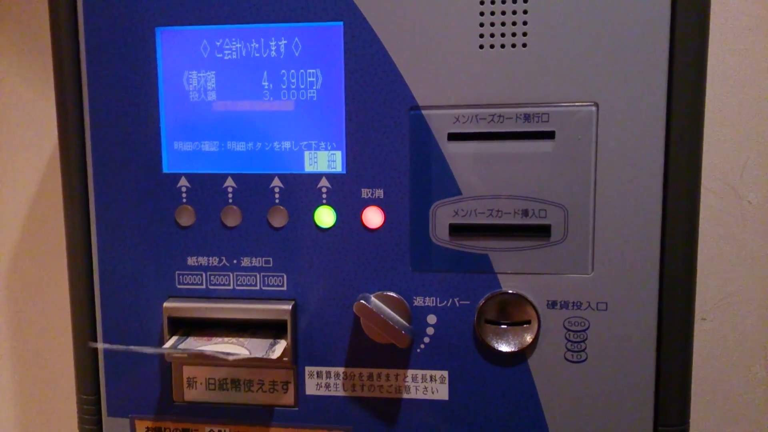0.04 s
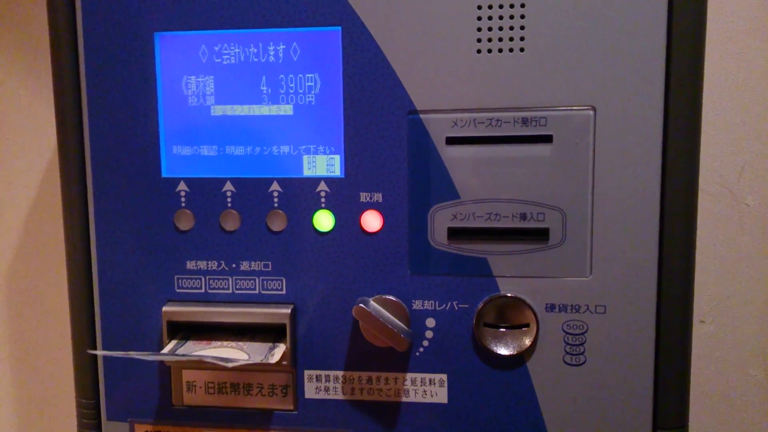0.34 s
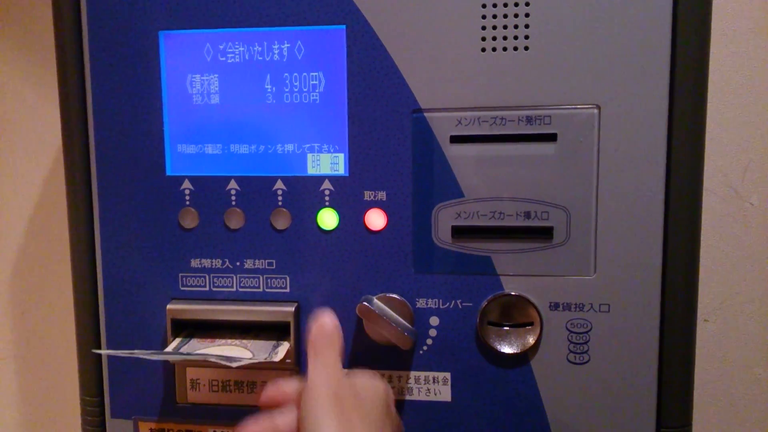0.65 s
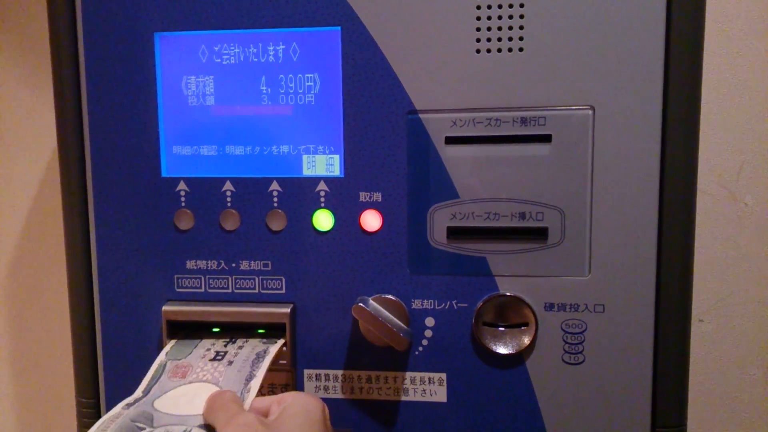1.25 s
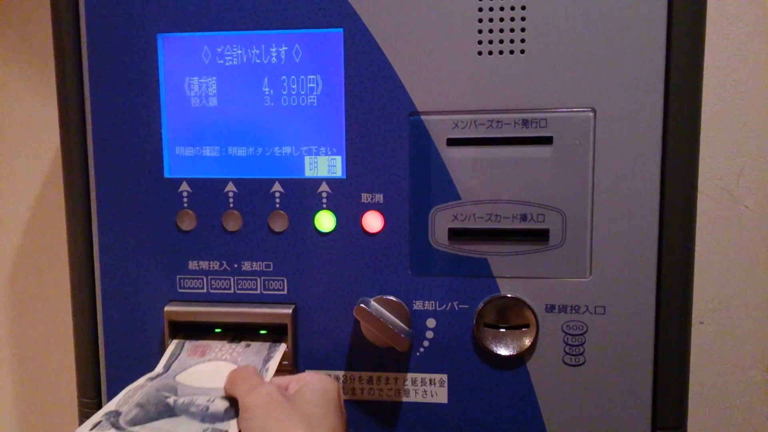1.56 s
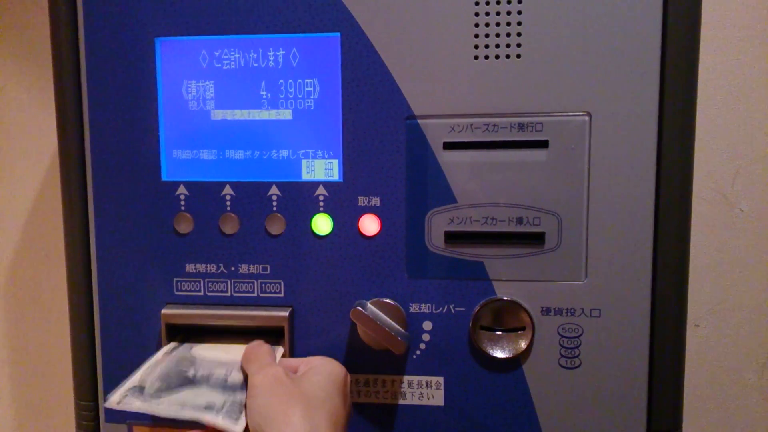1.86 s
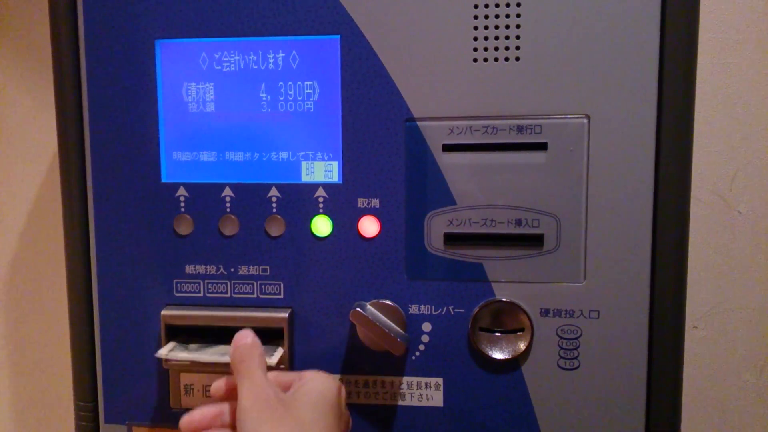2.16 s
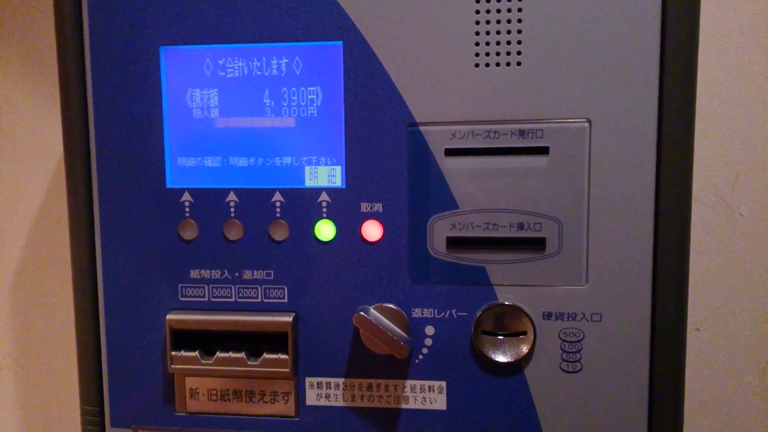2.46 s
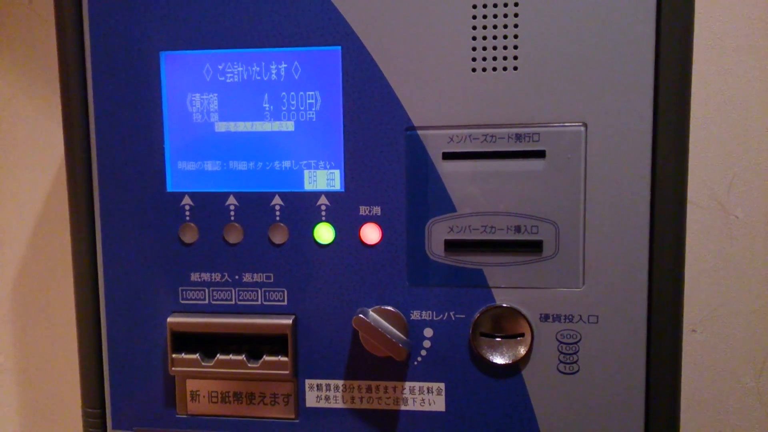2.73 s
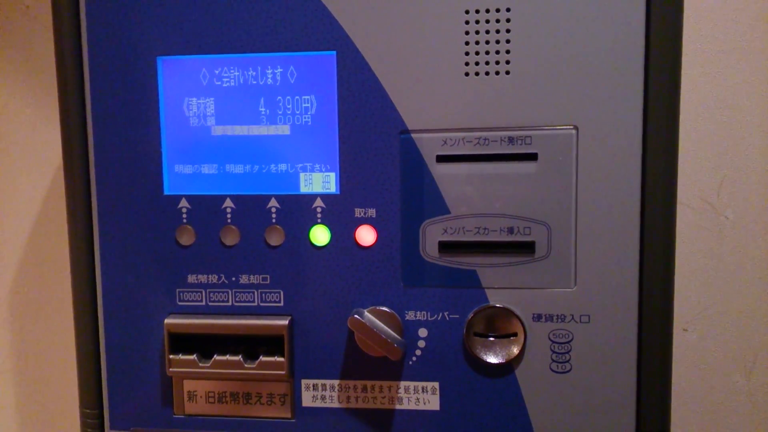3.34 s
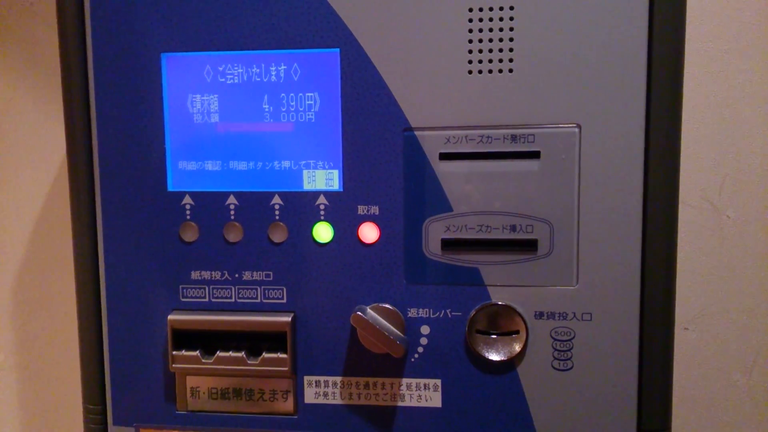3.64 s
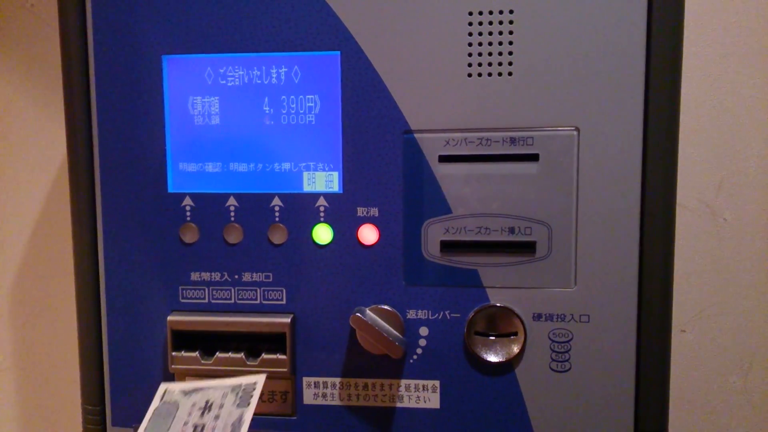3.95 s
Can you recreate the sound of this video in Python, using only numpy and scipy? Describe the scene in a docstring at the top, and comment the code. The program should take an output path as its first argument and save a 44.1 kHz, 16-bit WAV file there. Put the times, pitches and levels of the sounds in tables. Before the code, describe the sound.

Payment machine swallowing a banknote: light paper ticks, then latch clacks and a geared whir.

```python
"""A quiet room, close to a payment machine that swallows a banknote.
The note ticks, rustles and hisses against the slot. A latch clacks, a geared motor draws the note in
over rumbling rollers, a gate snaps, and a stacking motor runs, pauses and starts again.
Gear teeth rasp and whine; blows ring the latch and slot, and the front panel thuds.
Panel and room add short echoes over faint air noise and a deep throb."""
import sys
import numpy as np
from scipy import signal
from scipy.fft import rfft, irfft
from scipy.io import wavfile
from scipy.ndimage import uniform_filter1d, map_coordinates

SR = 44100
rng = np.random.default_rng(int(sys.argv[2]) if len(sys.argv) > 2 else 0)


def digitize_waveform(pressure):
    """Quantize a signal to 16-bit integers and store it at the path in sys.argv[1].

    Rows of a 2-D input are taken as channels; values are limited to [-1, 1].
    """
    field = np.atleast_2d(pressure).T
    bounded = np.clip(field, -1, 1)
    quanta = np.round(bounded * 32767).astype(np.int16)
    wavfile.write(sys.argv[1], SR, quanta)


N = 176400

# Spectra of room air, rollers and paper hiss. Each row: frequency in Hz, gain in dB.
AIR_COLOUR = [(40, -11.5), (70, -9), (130, -21), (300, -26), (700, -34.5), (1500, -39.5), (3000, -43),
              (4800, -37.5), (7000, -47), (11000, -49), (15500, -46)]
ROLLER_COLOUR = [(50, 5), (110, -20), (170, -3), (240, -5), (390, -17), (520, -10), (900, -14.5),
                 (1300, -22.5), (2000, -29.5)]
HISS_COLOUR = [(500, 0.5), (2300, -16.5), (4000, 4), (7000, 0), (11000, -4), (15500, -11)]
# Resonances of each part. Each row: frequency in Hz, gain in dB.
SLOT_BODY = [(300, -19.5), (700, -13.5), (1300, -14), (2300, -9), (3200, -7), (4000, -3.5), (4950, 1.5),
             (5600, -5.5), (6300, -11), (8500, -14), (12000, -25.5), (15500, -34)]
LATCH_BODY = [(200, -24), (400, -19), (620, -12), (900, -19.5), (1300, -11.5), (1800, -10), (2700, -12),
              (3300, -2), (3900, -7), (4700, 1), (5300, 3.5), (6200, -3.5), (7100, -4), (8300, -3),
              (9800, -4.5), (11300, -1), (13300, -5.5), (15500, -12.5)]
FEED_BODY = [(100, -13.5), (250, -17), (600, -13.5), (1400, -21.5), (2250, -13), (2700, -14.5), (3400, 0.5),
             (3800, -9), (4450, 4), (5000, -4.5), (5600, -0.5), (6150, -11.5), (6800, -8), (7500, -15.5),
             (9800, -23), (11300, -21.5), (12800, -29), (15500, -29)]
STACKER_BODY = [(100, -14), (300, -6), (700, -11), (1400, -15.5), (2600, -6), (3100, -4.5), (3700, 2.5),
                (5000, 0.5), (6200, -4.5), (8000, -15.5), (11000, -21), (15500, -29.5)]
# Envelopes of rollers, slot friction, paper hiss and feed motor. Each row: time in seconds, level in dB.
ROLLER_LEVEL = [(1.68, -100), (1.74, -57.5), (2.0, -76), (2.6, -64), (3.0, -70), (3.3, -58), (3.55, -66),
                (3.7, -72.5), (3.84, -80), (3.92, -66)]
SLIDE_LEVEL = [(0, -61), (.15, -76.5), (.34, -80.5), (.42, -61), (.48, -53.5), (.52, -57.5), (.555, -56),
               (.64, -75), (.84, -78), (.89, -63.5), (.95, -61.5), (1.07, -67.5), (1.12, -58), (1.22, -75),
               (1.35, -79), (1.52, -67), (1.56, -63), (1.66, -70.5), (2.2, -73), (2.6, -120)]
HISS_LEVEL = [(.36, -85), (.44, -69), (.48, -57), (.515, -68), (.56, -105), (.84, -79.5), (.89, -67.5),
              (.96, -58), (1.05, -71), (1.12, -66), (1.2, -82.5), (1.7, -68), (1.92, -57), (2.55, -60),
              (2.7, -71), (2.9, -120)]
FEED_LEVEL = [(1.68, -100), (1.72, -43), (1.78, -43.5), (1.85, -47.5), (2.21, -45.5), (2.3, -48),
              (2.52, -47.5), (2.59, -45), (2.75, -47), (2.88, -47), (3.02, -47), (3.3, -46), (3.4, -64),
              (3.55, -49), (3.66, -100), (3.72, -100)]
# Front panel thuds. Each row: start in seconds, level in dB, pitch in Hz, decay in seconds.
THUDS = [(.909, -61, 610, .035), (1.687, -55, 410, .03), (3.058, -56, 360, .04), (3.062, -57, 170, .045)]
# Blows of the note on the slot, and of latch and gate.
# Each row: start in seconds, level in dB, decay in seconds, bass in dB, treble in dB.
NOTE_FLICKS = [(.0412, -43.5, 0.0025, -2, 1), (.096, -55.5, 0.012, 6, -44), (.322, -64.5, 0.00076, 5, 20),
               (.376, -53, 0.0011, 1, 0), (.4294, -52, 0.0014, 11, -8), (.4643, -27, 0.0017, -7, -3),
               (.4955, -46, 0.0014, 2, 7), (.528, -26, 0.0016, -15, -17), (.538, -41, 0.0029, -11, -11),
               (.561, -40, 0.0017, -6, -17), (.649, -58, .001, 1, 10), (.908, -42.5, 0.0078, 3, 0),
               (1.099, -46.5, 0.0043, -15, -6), (1.111, -47, 0.0053, -20, 6), (1.1255, -44, 0.013, -49, -5),
               (1.415, -58, 0.00085, 1, 12), (1.5395, -47, 0.0013, -9, 1), (1.551, -47.5, 0.0017, -7, 3)]
LATCH_CLACKS = [(1.6822, -42, 0.0027, 6, -8), (1.6842, -34.5, 0.002, -15, -0.5),
                (1.6866, -22.5, 0.0053, -16, -20), (1.6905, -31.5, 0.00081, 0, -28),
                (1.6975, -32, 0.0079, -0.5, -12), (1.7402, -42.5, 0.0017, 12, 8.5),
                (1.7412, -25, 0.0056, -19, -28), (2.5728, -38, 0.001, -19, -3),
                (3.0545, -24, 0.0059, -31, -5), (3.0575, -40, 0.03, 5, -12),
                (3.0635, -25.5, 0.0043, -13, -32), (3.0662, -33.5, 0.0011, 8, -20),
                (3.642, -42.5, 0.0009, 3.5, -38)]
# Feed motor speed. Each row: time in seconds, tooth rate in Hz.
FEED_SPEED = [(1.69, 1000), (1.77, 1146), (1.85, 1121), (1.89, 1128), (1.97, 1125), (2.08, 1134),
              (2.12, 1153), (2.16, 1146), (2.22, 1121), (2.31, 1118), (2.39, 1095), (2.44, 1107),
              (2.52, 1105), (2.59, 1132), (2.65, 1127), (2.75, 1150), (2.81, 1120), (2.96, 1119),
              (3.07, 1127), (3.14, 1147), (3.22, 1129), (3.32, 1150), (3.37, 1236), (3.56, 1232),
              (3.7, 800)]
# Stacking motor run. Each row: time in seconds, tooth rate in Hz, level in dB.
STACKER_RUN = [(3.1, 905, -100), (3.24, 1200, -55.5), (3.37, 1295, -47.5), (3.56, 1311, -50),
               (3.61, 1162, -62.5), (3.68, 905, -76), (3.75, 703.4, -81), (3.83, 699, -76),
               (3.87, 1168, -53.5), (3.91, 1265, -49), (4.0, 1285, -49)]
# Shaft hum and weak gear tones. Each row: multiple of the shaft rate, level in dB re the motor.
FEED_WHINE = [(2, -22), (3, -24), (24, -25), (37, -21), (49, -20), (69, -23), (72, -20), (73, -23)]
STACKER_WHINE = [(12, -28), (33, -25), (46, -16), (47, -18), (51, -19), (54, -16)]
# Strong tones, keyed by multiple of the shaft rate.
# Each row: time in seconds, level in dB before the trim.
FEED_SWELLS = { 1: [(1.68, -110), (1.75, -74), (2.1, -68), (2.3, -62), (2.65, -61), (2.8, -69), (3.15, -70),
               (3.3, -61), (3.6, -72), (3.7, -110)], 36: [(1.7, -110), (1.79, -58), (1.92, -70),
               (2.02, -59), (2.08, -67), (2.15, -54), (2.36, -68), (2.44, -56), (2.55, -65), (2.69, -56),
               (2.82, -68), (2.95, -61), (3.04, -70), (3.135, -54), (3.19, -73), (3.3, -57), (3.45, -110)],
               48: [(1.7, -110), (1.78, -60), (1.87, -55), (1.94, -58), (2.05, -49), (2.11, -57),
               (2.36, -58), (2.44, -52), (2.53, -50), (2.62, -52), (2.75, -64), (2.85, -48), (2.96, -61),
               (3.21, -57), (3.33, -64), (3.4, -56), (3.56, -56), (3.66, -110)], 57: [(1.7, -110),
               (1.9, -66), (2.74, -68), (2.82, -56), (2.95, -62), (3.25, -63), (3.4, -110)],
               60: [(1.7, -110), (1.8, -68), (1.87, -58), (1.97, -59), (2.07, -70), (2.23, -56),
               (2.42, -71), (2.66, -64), (3.3, -64), (3.45, -110)], }
STACKER_SWELLS = { 24: [(3.25, -110), (3.38, -62), (3.45, -59), (3.55, -60), (3.63, -100), (3.84, -100),
                  (3.91, -71), (4.0, -71)], 36: [(3.25, -110), (3.38, -62), (3.53, -55), (3.57, -58),
                  (3.64, -100), (3.84, -100), (3.91, -61), (4.0, -62)], }
# Stereo balance. Each row: frequency in Hz, left minus right in dB.
BALANCE = [(100, -2.5), (400, -5), (1300, 1), (2300, -6.5), (3300, -3), (4000, -9), (4700, -12),
           (5300, -16), (6200, -6.5), (6900, -6.5), (8000, -3.5), (9700, -6), (11400, -3), (13300, 1),
           (15500, 11.5)]


def from_db(db):
    return 10 ** (np.asarray(db) / 20)


def unit_rms(x):
    return x / np.sqrt(np.mean(x ** 2) + 1e-20)


def curves(rows):
    """Each column after the time, interpolated per sample."""
    times_s, *columns = np.transpose(rows)
    return [np.interp(np.arange(N) / SR, times_s, column) for column in columns]


def drift(rate_hz):
    """Slow random wander, rms 1."""
    step = 40
    pole = np.exp(-2 * np.pi * rate_hz * step / SR)
    noise = rng.standard_normal(N // step + 2002)
    slow = signal.lfilter([1], [1, -2 * pole, pole * pole], noise)[2000:]
    return np.interp(np.arange(N) / step, np.arange(len(slow)), unit_rms(slow))


def response(spectrum, power=1, size=4096):
    """Minimum-phase impulse response of a spectrum."""
    hz, db = np.transpose(spectrum)
    grid_hz = np.maximum(np.arange(size // 2 + 1) * SR / size, 1)
    gain = from_db(power * np.interp(np.log(grid_hz), np.log(hz), db))
    cepstrum = irfft(np.log(gain))
    cepstrum[1:size // 2] *= 2
    cepstrum[size // 2 + 1:] = 0
    return irfft(np.exp(rfft(cepstrum)))


def ring(force, spectrum):
    """A force rings a body; white noise keeps its level."""
    impulse = response(spectrum)
    return signal.oaconvolve(force, impulse / np.linalg.norm(impulse))[:N]


def from_slot(x, lag_s=7 / SR):
    """Sound from the slot reaches the right side later."""
    t = np.arange(N) / SR
    return np.array([x, np.interp(t - lag_s, t, x)])


def room_noise(air_db=-62, throb_db=-46.5, throb_hz=20.2, mono_below_hz=500):
    """A deep throb and faint air, alike on both sides only in the bass."""
    mid, side = (ring(rng.standard_normal(N), AIR_COLOUR) for _ in range(2))
    side = signal.sosfilt(signal.butter(1, mono_below_hz, "high", fs=SR, output="sos"), side)
    air = mid + 0.69 * side * np.array([[1], [-1]])
    waver_db = drift(rate_hz=1)
    throb = unit_rms(np.sin(2 * np.pi * throb_hz * np.arange(N) / SR) * from_db(waver_db))
    return from_db(air_db) * air + from_db(throb_db) * throb


def echoes(x, t60_s, low_cut_hz=285):
    """Dense dying reflections above the bass, unrelated left and right."""
    t = np.arange(SR // 2) / SR
    tail = rng.standard_normal((2, len(t))) * from_db(-60 * t / t60_s) * (t > .0005)
    tail /= np.linalg.norm(tail, axis=1, keepdims=True)
    x = signal.sosfilt(signal.butter(2, low_cut_hz, "high", fs=SR, output="sos"), x)
    return signal.oaconvolve(x, tail, axes=1)[:, :N]


def rollers():
    """Rubber rollers and belts rumble in the cabinet."""
    level_db, = curves(ROLLER_LEVEL)
    return from_db(level_db) * ring(rng.standard_normal(N), ROLLER_COLOUR)


def panel_thuds(edge_ratio=1.125):
    """Clusters of low panel modes start abruptly and die away."""
    out = 0
    for start_s, db, hz, decay_s in THUDS:
        age_s = np.arange(N) / SR - start_s
        envelope = (age_s > 0) * np.exp(-abs(age_s) / decay_s)
        band = signal.butter(1, [hz / edge_ratio, hz * edge_ratio], "band", fs=SR, output="sos")
        modes = unit_rms(signal.sosfilt(band, rng.standard_normal(N)))
        out += from_db(db) * envelope * modes
    return out


def sliding_note(catches_per_s=1100, catch_db=-10.5):
    """Paper fibres catch on the slot and ring it; the face of the note hisses."""
    def friction():
        catches = (rng.random(N) < catches_per_s / SR) * rng.standard_normal(N)
        return unit_rms(rng.standard_normal(N) + from_db(catch_db) * unit_rms(catches))

    rustle = from_db(curves(SLIDE_LEVEL)[0]) * ring(friction(), SLOT_BODY)
    hiss = from_db(curves(HISS_LEVEL)[0]) * ring(friction(), HISS_COLOUR)
    return rustle + hiss


def chatter(envelope):
    """Random contacts under an envelope, whitened to favour no pitch."""
    hit = envelope * rng.standard_normal(len(envelope))
    for _ in range(3):
        spectrum = rfft(hit)
        white = irfft(spectrum / (abs(spectrum) + 1e-20), len(hit))
        local_rms = np.sqrt(abs(uniform_filter1d(white ** 2, size=40)) + 1e-20)
        hit = envelope * white / local_rms
    return hit


def blows(rows, body, rattle_db, rattle_s=.025, bass_hz=3050, treble_hz=7340):
    """Each blow, a short chatter and a weaker rattle, rings one part."""
    force = np.zeros(N + SR)
    t = np.arange(SR // 5) / SR
    for start_s, db, decay_s, bass_db, treble_db in rows:
        hit = chatter(np.exp(-t / decay_s) + from_db(rattle_db) * np.exp(-t / rattle_s))
        tilt = [(bass_hz / 2, bass_db), (bass_hz, bass_db / 2), (np.sqrt(bass_hz * treble_hz), 0),
                (treble_hz, treble_db / 2), (2 * treble_hz, treble_db)]
        hit = signal.oaconvolve(hit, response(tilt, size=256))[:len(t)]
        start = int(start_s * SR)
        force[start:start + len(t)] += from_db(db) * hit
    return ring(force[:N], body)


def gear_tone(phase_rad, waver_db=1.5, waver_hz=7, flutter_db=2.8, flutter_hz=35, jitter_rad=.25):
    """A sine that wavers slowly and flutters fast, rms 1."""
    gain = from_db(waver_db * drift(waver_hz) + flutter_db * drift(flutter_hz))
    phase_rad = phase_rad + jitter_rad * drift(flutter_hz) + 2 * np.pi * rng.random()
    return unit_rms(gain * np.sin(phase_rad))


def gear_rasp(contact, turns, housing, repeat_share=.1):
    """Rubbing teeth ring the housing; part of the roughness repeats every turn."""
    profile = rng.standard_normal(400)
    wear = unit_rms(map_coordinates(profile, [turns % 1 * len(profile)], order=3, mode="grid-wrap"))
    surface = np.sqrt(repeat_share) * wear + np.sqrt(1 - repeat_share) * rng.standard_normal(N)
    return ring(unit_rms(contact * surface), housing)


def motor(tooth_hz, level_db, housing, whine, swells, rasp_db,
          teeth=12, tooth_scatter_db=.5, leak_share=.39, tone_trim_db=-3):
    """Meshing teeth rasp, the gears whine and the shaft hums. Stereo."""
    teeth_passed = np.cumsum(tooth_hz * (1 + .0012 * drift(rate_hz=22.5))) / SR
    turns = teeth_passed / teeth
    shaft_rad = 2 * np.pi * turns
    strength = from_db(tooth_scatter_db * rng.standard_normal(N)[teeth_passed.astype(int)])
    tooth_pulses = np.exp(.91 * np.cos(2 * np.pi * teeth_passed))
    contact = tooth_pulses * strength * (1 + .044 * np.cos(shaft_rad))
    # Rasp leaking through the cabinet reaches each side on its own.
    direct, *leaks = (gear_rasp(contact, turns, housing) for _ in range(3))
    rasp = np.sqrt(1 - leak_share) * from_slot(direct) + np.sqrt(leak_share) * np.array(leaks)
    weak = sum(from_db(db) * gear_tone(k * shaft_rad) for k, db in whine)
    # Strong gear tones sound alike on both sides, with no delay.
    strong = sum(from_db(curves(rows)[0]) * gear_tone(k * shaft_rad) for k, rows in swells.items())
    tones = from_slot(from_db(level_db) * weak) + from_db(tone_trim_db) * strong
    return from_db(level_db + rasp_db) * rasp + tones


def scene():
    """Note from the slot, latch and motors from the whole cabinet; panel and room echo."""
    feed = motor(*curves(FEED_SPEED), *curves(FEED_LEVEL), FEED_BODY, FEED_WHINE, FEED_SWELLS, rasp_db=-2)
    stacker = motor(*curves(STACKER_RUN), STACKER_BODY, STACKER_WHINE, STACKER_SWELLS, rasp_db=1)
    latch = np.array([blows(LATCH_CLACKS, LATCH_BODY, rattle_db=-11) for side in range(2)])
    note = blows(NOTE_FLICKS, SLOT_BODY, rattle_db=-25) + sliding_note()
    machine = feed + stacker + latch + from_slot(note + panel_thuds() + rollers())
    panel_echo = from_db(-7) * echoes(machine, t60_s=.03)
    room_echo = from_db(-8) * echoes(machine, t60_s=.3)
    return machine + panel_echo + room_echo + room_noise()


def record(dry):
    """Two microphones of differing colour, then a steep top cut."""
    stop_hz = 16600
    heard = [signal.oaconvolve(x, response(BALANCE, power))[:N] for x, power in zip(dry, (.5, -.5))]
    return signal.sosfilt(signal.cheby2(16, 60, stop_hz, fs=SR, output="sos"), heard)


dry = scene()
out = record(dry)
digitize_waveform(out)
```